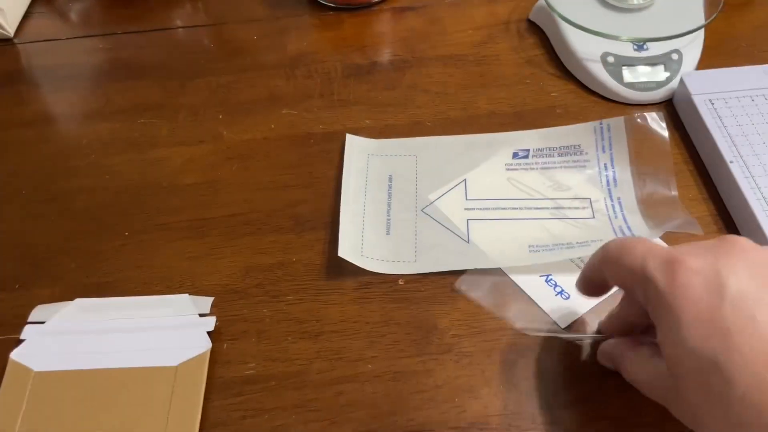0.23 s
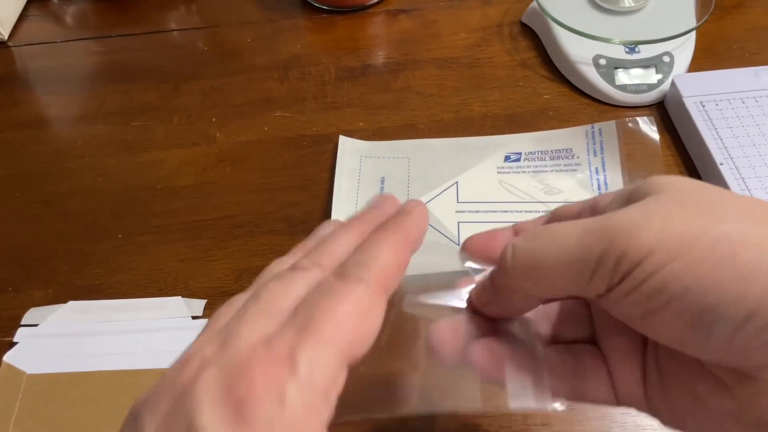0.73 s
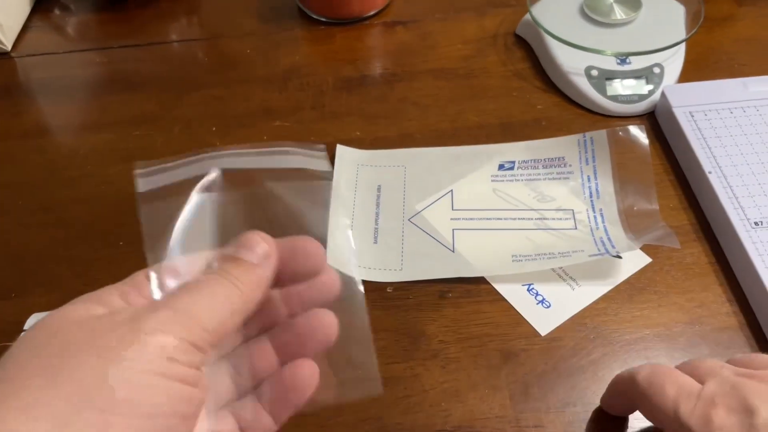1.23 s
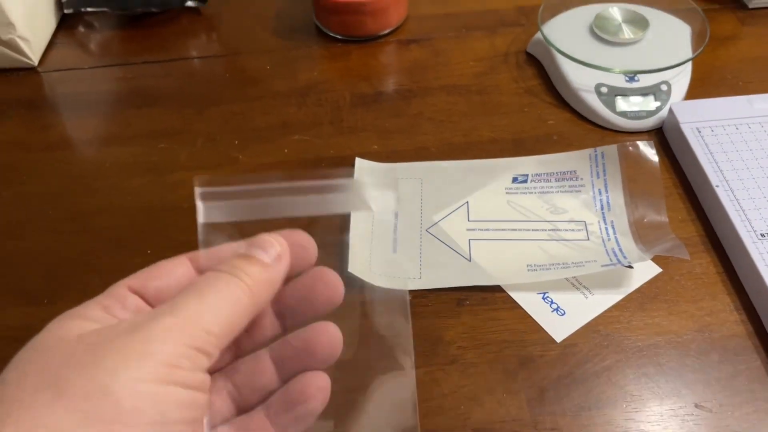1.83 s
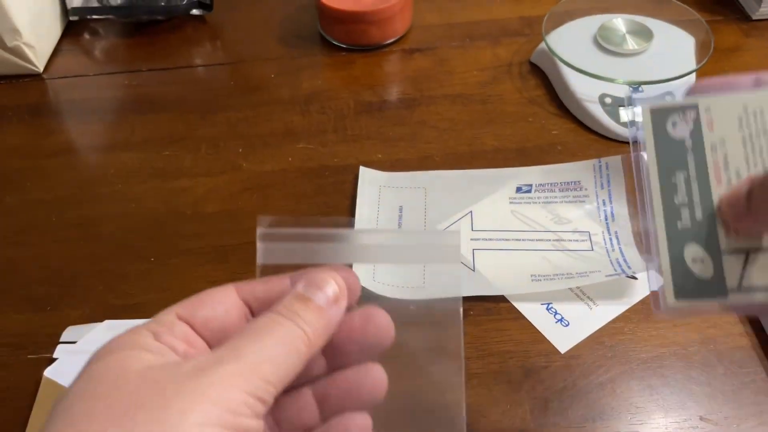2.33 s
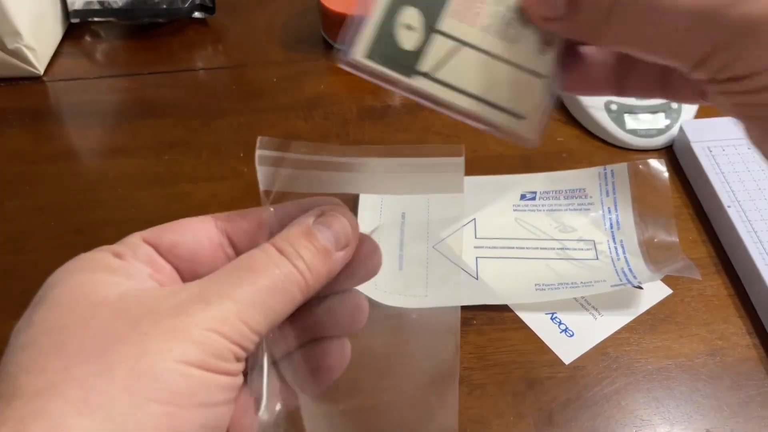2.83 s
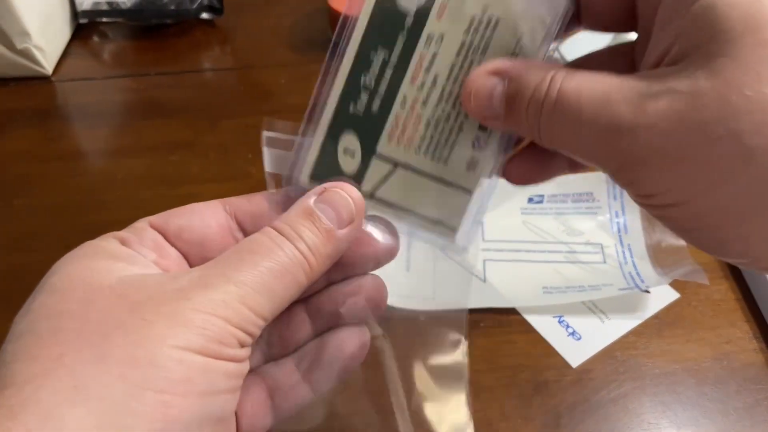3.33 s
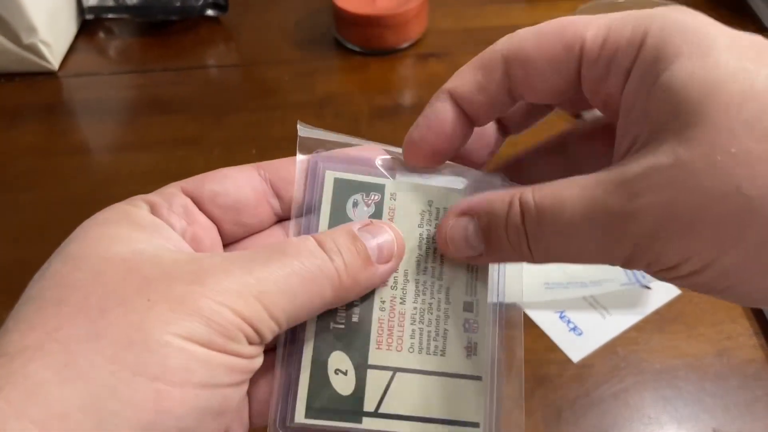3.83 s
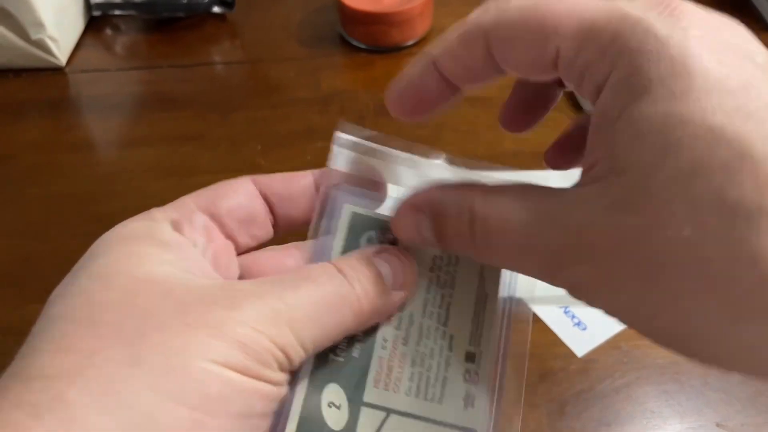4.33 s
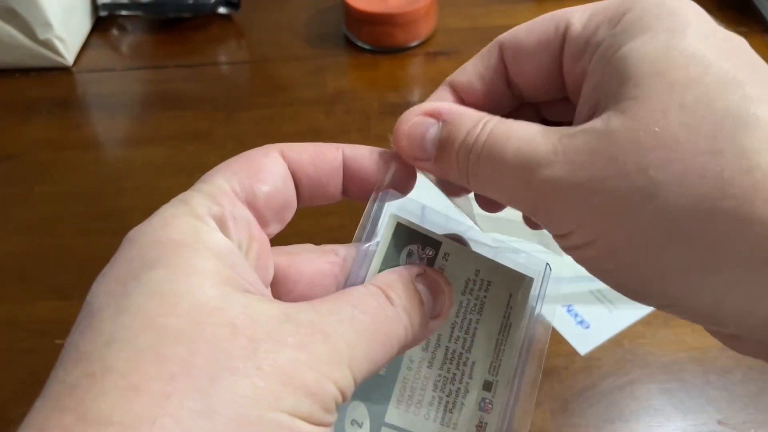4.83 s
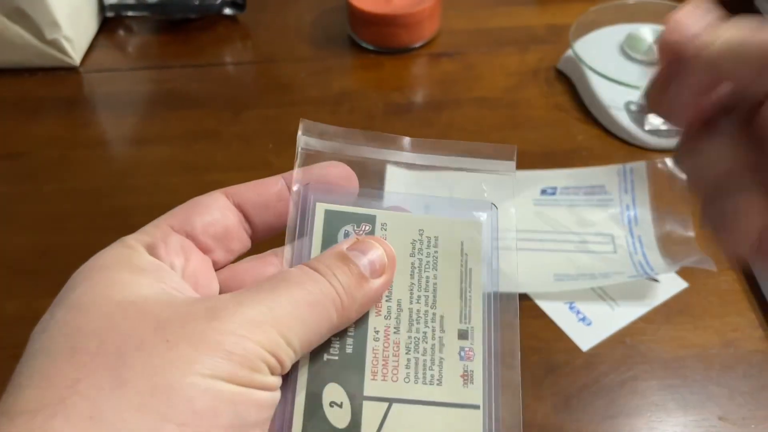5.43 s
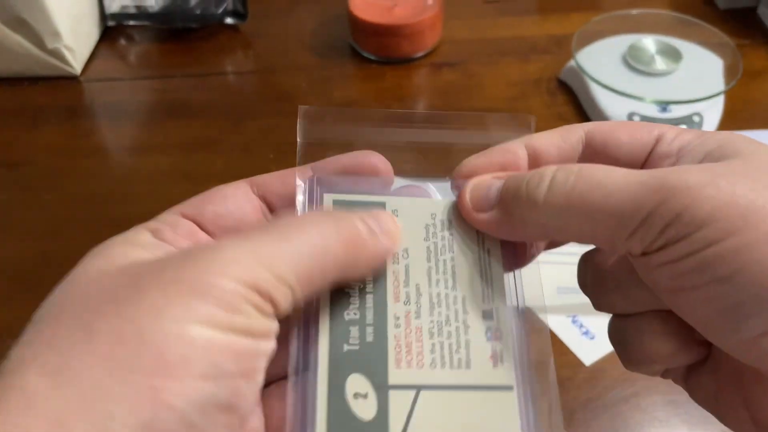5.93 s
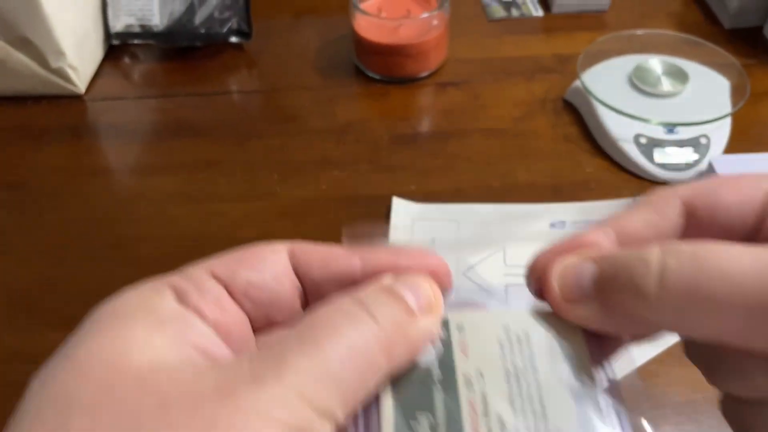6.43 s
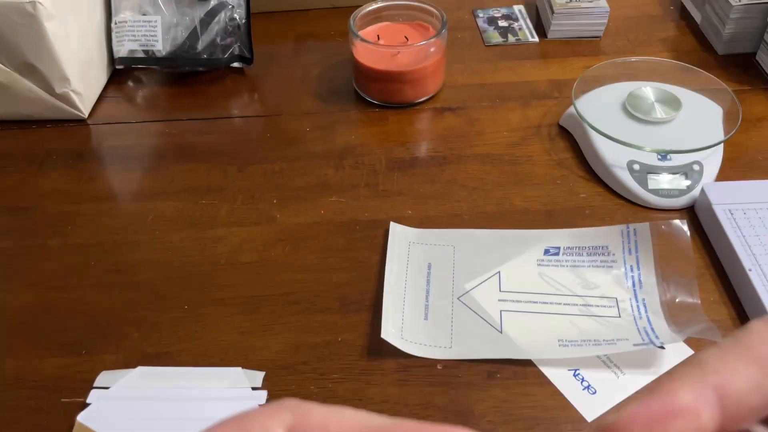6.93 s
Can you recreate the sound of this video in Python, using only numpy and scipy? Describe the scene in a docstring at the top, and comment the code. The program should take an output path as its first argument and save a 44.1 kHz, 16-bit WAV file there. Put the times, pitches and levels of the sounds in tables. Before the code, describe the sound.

Dry, intimate handling of crisp plastic film over a wooden table, indoors. Sparse snaps and soft bumps come first, then very faint rubbing, one bright tick, a thicker run of crackling as a rigid sleeve goes in, deep soft thuds, a sharp cluster of snaps as glue lets go, and short squeaky scrapes before it fades into quiet room air.

```python
"""A quiet room with a faint drone: on a wooden table, hands lift a thin plastic bag close to a two-port microphone,
slide a card holder in, peel the adhesive strip and fold the flap.
Snaps are short bursts that ring film and bag; rustle is patchy hiss with tiny grains, and scrapes are sliding resonances.
Forearms thump the table as falling sine tones. Rumble, room air, drone and a narrow hiss are shaped noise."""
import sys
import numpy as np
from scipy import signal
from scipy.fft import rfft, irfft
from scipy.io import wavfile
from scipy.ndimage import uniform_filter1d

SR = 44100
rng = np.random.default_rng(int(sys.argv[2]) if len(sys.argv) > 2 else 0)


def output_pcm(signal):
    """Save a mono or channel-first signal as 16-bit PCM at the path in sys.argv[1].

    Samples are clipped to [-1, 1] before scaling.
    """
    pcm = np.clip(np.atleast_2d(signal).T, -1, 1) * 32767
    wavfile.write(sys.argv[1], SR, np.round(pcm).astype(np.int16))


N = 317520  # samples

# Room air and table rumble, as tone colours. Each row: pitch in Hz, gain in dB.
AIR_COLOUR = [(120, -19.5), (150, -3.5), (232, -5.5), (346, -9.5), (500, -3.5), (700, -16), (1100, -13.5),
              (1300, -42), (2200, -25.5), (7000, -47.5)]
RUMBLE_COLOUR = [(18, -47), (30, -17.5), (44, -15), (65, -7.5), (103, -6), (178, -14.5), (260, -16),
                 (340, -36.5), (570, -120)]
# Level of the room air. Each row: time in seconds, level in dB.
AIR_LEVEL = [(0.0, -67), (0.86, -64.5), (1.0, -61.5), (1.96, -66), (2.36, -79), (3.03, -67), (3.19, -62.5),
             (4.89, -66), (5.35, -65), (6.32, -62), (6.76, -65.5), (7.2, -63)]
# Level of the table rumble under the moving arms. Each row: time in seconds, level in dB.
ARMS = [(0.0, -59), (0.4, -57), (1.08, -53), (1.46, -61.5), (2.36, -69.5), (3.07, -61.5), (3.25, -57),
        (3.83, -56), (4.07, -49.5), (4.43, -57), (4.65, -63.5), (5.61, -63), (5.81, -59.5), (6.24, -59),
        (6.36, -56), (7.2, -58.5)]
# An appliance drones. Its one row: pitch in Hz, width in Hz, level in dB relative to the room air.
HUM = (354, 22, 2.5)
# A faint narrow hiss comes and goes. Each row: start in seconds, end in seconds, level in dB.
WHISTLE = [(2.416, 3.293, -72.5), (4.504, 5.2, -81), (5.415, 6.548, -72)]
# Arms and hands landing on the table. Each row: start in seconds, peak in dB, nominal pitch in Hz.
THUMPS = [(.117, -43, 72), (0.441, -48, 99), (0.527, -35, 141), (0.613, -43, 112), (0.721, -45, 98),
          (0.804, -50, 88), (0.846, -40.5, 74), (0.937, -40.5, 78.5), (0.994, -41, 99), (1.176, -39.5, 197),
          (1.429, -50, 122), (3.044, -33, 185), (3.079, -43.5, 150), (3.151, -42, 235), (3.287, -52, 80),
          (3.398, -50, 94), (3.834, -42, 61), (3.926, -29, 75), (3.968, -32, 51), (4.049, -27, 100.6),
          (4.067, -28.5, 64.5), (4.085, -30, 72.4), (4.117, -38, 101), (4.167, -44, 149),
          (4.216, -32.5, 63.3), (4.32, -48, 78), (4.757, -42.5, 282), (5.004, -27, 297), (5.1, -38, 245),
          (5.624, -47.5, 87.5), (6.515, -36.5, 100)]
# Fingers rubbing the film, one row a stroke. Each row: start in seconds, end in seconds, rustle level in dB,
# treble in dB relative to the rustle, bag body in dB relative to the rustle.
RUB_STROKES = [(0, 0.102, -72, -1, -8), (0.148, 0.273, -63.5, 1.5, -11), (0.33, 0.405, -69.5, 1, -24),
               (0.413, 0.487, -61, 0.5, -4), (0.517, 0.695, -61.5, -4, -1.5), (0.782, 0.805, -48, -4, -1.5),
               (0.857, 0.961, -64, -7, -2), (1.047, 1.214, -59.5, -4, -2), (1.271, 1.317, -62, -0.5, -2.5),
               (1.38, 1.43, -65, -3.5, -10), (1.534, 1.65, -67, -3.5, -1.5), (1.675, 1.835, -62.5, -3, -6),
               (1.856, 1.91, -66.5, -7, 9), (2, 2.205, -74.5, -4, 4.5), (2.256, 2.408, -69, -5, -0.5),
               (2.45, 2.517, -82, -11, 9), (2.547, 2.654, -71, -4, 2), (2.648, 2.765, -58, -3, -10),
               (3.044, 3.244, -58, -6, 0.5), (3.284, 3.448, -56, 0, -5), (3.478, 3.555, -60.5, 3, -8),
               (3.618, 3.762, -57, 5.5, -12), (3.774, 3.818, -61, -23, 1), (3.898, 4, -69, -3.5, 2),
               (4.043, 4.083, -68, -1, 6), (4.206, 4.232, -52.5, -4, 4), (4.441, 4.467, -76, 12, 16),
               (4.468, 4.63, -57, -2.5, -4), (4.634, 4.76, -56, -5, -4), (4.839, 4.99, -63.5, -5, 6.5),
               (4.992, 5.15, -58.5, -2, 9), (5.234, 5.267, -59.5, 2, -6.5), (5.303, 5.423, -54, 0.5, -13),
               (5.48, 5.504, -64.5, 5, 2), (5.56, 5.727, -65, 2, -6), (5.838, 5.987, -69, 5.5, 4.5),
               (6, 6.057, -89, 5, 2), (6.118, 6.462, -72, -1.5, -2), (6.514, 6.589, -61, -3, -4),
               (6.666, 6.717, -79.5, 0.5, 3), (6.762, 6.889, -69.5, 0.5, -4), (6.97, 7.195, -70, -1.5, 0)]
# A taut patch of film sings under a sliding finger. Each row: start in seconds, end in seconds, first pitch in Hz,
# last pitch in Hz, width of each resonator pass in Hz, level in dB.
SCRAPES = [(0.187, 0.402, 5640, 5700, 1500, -66.5), (1.111, 1.233, 600, 448, 500, -49.5),
           (1.752, 1.843, 2540, 2470, 700, -60.5), (1.77, 1.812, 6800, 6740, 900, -61),
           (2.625, 2.667, 4300, 4300, 1210, -61.5), (3.798, 3.86, 2030, 2630, 500, -68),
           (5.287, 5.444, 2470, 2700, 497, -50.5), (5.29, 5.42, 3600, 3800, 1200, -59),
           (5.54, 5.598, 3700, 3820, 400, -67), (5.54, 5.65, 4600, 4830, 450, -68),
           (5.6, 5.642, 5550, 5560, 500, -56), (6.22, 6.436, 6500, 6370, 503, -68.5),
           (6.525, 6.624, 4400, 5040, 1000, -68), (6.753, 6.915, 7300, 7130, 905, -65.5),
           (7.023, 7.164, 2300, 2300, 1800, -68.5)]
# Film under the skin, its treble and the bag body while rubbed. Each row: pitch in Hz, gain in dB.
RUSTLE_COLOUR = [(1500, -30), (2300, -8), (3200, -5), (5000, 0), (6300, -1), (7400, -2), (8500, -13),
                 (11000, -30)]
SHEEN_COLOUR = [(6000, -30), (7000, -5), (7800, 0), (10000, -3), (13000, -8), (15000, -5), (16200, -6)]
BAG_COLOUR = [(350, 6), (600, -1.5), (1000, -5), (1600, -3), (1900, -7.5), (2400, -4.5)]
# Creases snapping and glue letting go. Each row: time in seconds, film energy in dB s, film pitch in Hz,
# bag body in dB relative to the film, body pitch in Hz, treble in dB relative to the film, nominal length in ms.
SNAPS = [(0.075, -82.5, 5900.0, -0.5, 700, -4, 3.2), (0.161, -69.0, 4200.0, -11, 950, 0, 2),
         (0.454, -77.5, 2300.0, -4, 1600, -14, 2.4), (0.5159, -60, 4700.0, -10.5, 1040, -6.5, 0.6),
         (0.7158, -81, 3300.0, -6, 660.0, -27, 0.51), (0.773, -68.5, 5500.0, -4, 930, 11, 16),
         (0.8049, -60.5, 3800.0, 5, 817, -7, 1.8), (0.8586, -71, 6500.0, 0, 1620, 1, 1),
         (0.876, -74, 4100.0, -2, 450.0, -20.0, 1.3), (0.8995, -65, 6500.0, -4, 590, 0.5, 0.9),
         (1.036, -81, 2700.0, -21, 900.0, -15.0, 0.6), (1.062, -67.5, 4100.0, -1.5, 870, -18, 0.79),
         (1.0722, -65, 4000.0, -1, 554, -15, 0.66), (1.076, -66, 4500.0, 6, 570, -12, 2.9),
         (1.092, -80, 4500.0, 9, 525.0, -3, 1.7), (1.157, -73, 4460, 1, 900, 3.5, 9.6),
         (1.167, -75.5, 3400, 19, 530, -7, 4), (1.186, -91.5, 4500.0, 27, 435, -12.0, 15),
         (1.2913, -75.5, 2700.0, 4, 880, -8, 3.5), (1.304, -77.5, 2700.0, 4, 640, -9, 6.8),
         (1.5215, -70.5, 4700.0, -4, 740, -25, 0.79), (1.5571, -87.5, 4800.0, 15, 544, -1.0, 5.7),
         (1.709, -61.5, 5300.0, -4.5, 888, -9, 2.4), (1.785, -76.5, 3300.0, -22, 900.0, -13, 4.3),
         (1.842, -80.5, 2500.0, 1, 1540.0, -12.0, 0.85), (1.856, -88, 2300, 1, 1500, -7, 0.91),
         (1.8622, -82, 2300.0, 0, 900.0, -8.0, 0.37), (1.8663, -79.5, 2300.0, 3, 1000, -19.0, 5.8),
         (1.8925, -75, 2300, 0.5, 1410, -9, 1.7), (1.897, -74, 2300.0, 3, 1620, -11, 14),
         (1.977, -84.5, 3900.0, 6, 635, -21, 1.8), (2.04, -88.5, 2300.0, 11, 2030, 7, 1.9),
         (2.094, -80.5, 2300.0, 2, 2020, -9, 10), (2.117, -79.5, 2300.0, 9.5, 740, -1, 0.59),
         (2.161, -89, 2300.0, 7.5, 1850, -2, 9.9), (2.189, -92, 2300.0, 0, 1700.0, -12, 2.2),
         (2.209, -94, 2300.0, 9, 1600.0, -9.0, 2.3), (2.224, -98, 2300.0, 16.5, 874, -13, 1.1),
         (2.2418, -88, 2600.0, 5, 1420, -31.0, 3.1), (2.308, -75.5, 3600.0, -3, 970, -19, 1.4),
         (2.396, -86.5, 4300.0, 8, 550, 2, 4.6), (2.4237, -82.5, 4200.0, 3, 796, -13, 0.65),
         (2.6914, -47, 6000.0, -24.5, 1410, 3, 0.91), (2.8149, -74.5, 3600.0, -4, 490, -9, 1.3),
         (3.0266, -77, 2300, 3, 1090, -7, 0.7), (3.028, -63.5, 6400.0, -7, 1070, 0.5, 7.3),
         (3.039, -73, 2280, 6, 1340, -11.5, 0.7), (3.0427, -59.5, 5400.0, 0, 1180, -7, 2.8),
         (3.053, -79, 2300.0, 9, 620.0, 3, 2.7), (3.0736, -84.5, 5300.0, 20, 760, 0.0, 1.7),
         (3.082, -68, 2300.0, -4, 1500.0, -12.0, 0.95), (3.0984, -57, 3300.0, -1.5, 1330, 7, 2.6),
         (3.1558, -59, 3300.0, 1, 575, -6, 1.7), (3.171, -70, 3000, 0.5, 510, 2, 2),
         (3.194, -75, 3000.0, -6, 840.0, -10, 0.96), (3.231, -58, 4400.0, -8.5, 1160, -6, 5.8),
         (3.2718, -64.5, 4700.0, 6.5, 1070, 1, 1.6), (3.2759, -57, 5200.0, -3, 473, 6.5, 1),
         (3.291, -62, 5700.0, -0.5, 1530, -1, 3.9), (3.3331, -58, 5300.0, -11, 1440, -0.5, 10.5),
         (3.3919, -58, 4700.0, -12, 804, 9, 0.7), (3.399, -69, 5500.0, 2, 765, -5, 2.3),
         (3.432, -88, 5400.0, 0, 1660.0, -4, 2.0), (3.457, -88.5, 5600.0, 25.5, 650, 1.0, 2.3),
         (3.52, -82, 4200.0, 1, 880, -9.0, 1.1), (3.528, -82, 4700.0, 6, 875, -9.0, 1.2),
         (3.5742, -62, 6800.0, -3.5, 1200, -1, 1.8), (3.622, -86.5, 7100.0, 12.5, 1000.0, -9.0, 0.88),
         (3.633, -77, 4800.0, -1, 448, -2, 2.8), (3.675, -84, 4100.0, 7, 1200.0, -9.0, 2.5),
         (3.76, -76.5, 6200.0, 3, 1160, -6, 0.57), (3.786, -80, 5400.0, -3, 1320, -7, 1.2),
         (3.809, -79, 4400.0, 3, 1490, -13, 1.6), (3.906, -72, 4100.0, -10, 590, -6, 10),
         (4.0118, -92, 5000.0, 21, 670, 8, 0.89), (4.026, -60.5, 4800.0, 0, 506, -2, 1.1),
         (4.111, -83.5, 2300.0, 15, 1350, -22, 0.66), (4.2043, -78.5, 4400.0, 16, 417, -16, 0.87),
         (4.225, -57.5, 2300.0, 5.5, 1400, 2.5, 2.6), (4.23, -71.5, 3100.0, 15.5, 930, -34, 0.76),
         (4.273, -71.5, 6100.0, 0.5, 601, 1, 16), (4.423, -86.5, 2300.0, 18.5, 414, 3, 1.5),
         (4.467, -51.5, 3200.0, -2, 598, 4, 0.86), (4.6759, -67.5, 3200.0, -2.5, 930, -4, 1.8),
         (4.7208, -86.5, 3300.0, 15, 1500.0, -8, 1), (4.741, -89, 5100.0, 19, 1590.0, -10.0, 1.2),
         (4.7572, -61.0, 5100.0, 5, 1570, 1.5, 1.9), (4.777, -65.5, 4000.0, -13, 1680.0, -25.5, 0.79),
         (4.796, -83, 2300.0, 13, 1250, -12.5, 2.4), (4.8683, -81, 2300.0, 17.5, 1430, -9, 1.2),
         (4.8945, -52, 4500.0, 4, 1460, 9.5, 1.7), (4.9059, -66.5, 4400.0, 6, 1130, -15, 0.72),
         (4.95, -66.5, 4100.0, -3, 1610, -3.5, 2.3), (5.0042, -48.5, 5400.0, 1, 523, 10, 3.3),
         (5.01, -54.5, 5400.0, 5, 390, 3.5, 1), (5.011, -62, 5340, 9, 1580, 1, 28),
         (5.0136, -47.5, 5400.0, -10, 524, -1.5, 1.5), (5.0166, -49.5, 5800.0, -8, 550, 3.5, 1.2),
         (5.02, -45.5, 5300.0, -7.5, 570, 15, 0.43), (5.026, -53, 5300.0, -6, 445, 1.5, 1),
         (5.026, -55, 6900.0, 10.5, 320, -3, 1.1), (5.0282, -57.5, 5600.0, 0.5, 330, 7, 3.6),
         (5.06, -59, 3000.0, 10.5, 1570, 7.5, 4), (5.0709, -44, 5000.0, 4, 687, 4, 5.3),
         (5.084, -62.5, 6500.0, 1, 1550, -4, 1.5), (5.088, -46.5, 4200.0, 4, 630, 2.5, 3.1),
         (5.1059, -43.5, 4500.0, -10.5, 795, 2.5, 0.56), (5.1094, -56, 4600.0, -9.5, 695, -5, 0.45),
         (5.1095, -43.5, 4400.0, -5, 670, -2.5, 0.46), (5.1135, -43.5, 3000.0, -16.5, 650.0, 6, 0.9),
         (5.1206, -50.5, 4600.0, -2, 626, 1.5, 0.9), (5.1242, -52.5, 5100.0, -6.5, 1310, 1, 1.1),
         (5.135, -64.5, 6500.0, -9, 570, 8, 3.2), (5.162, -58.5, 6700.0, -2, 1304, 1.5, 4.8),
         (5.183, -58, 4100.0, -6, 1250, 5, 2.7), (5.285, -78.5, 6800.0, -24, 430.0, 5, 1.2),
         (5.293, -73, 6400.0, -19, 430.0, 6, 1.6), (5.298, -69, 3600.0, -20, 460.0, 5.5, 3.6),
         (5.309, -61.5, 3300.0, -29, 810.0, -3, 2.3), (5.3239, -66.5, 3600.0, -18, 1007.0, 11, 0.39),
         (5.327, -69, 4000.0, -12, 480, 12.5, 3), (5.3465, -53, 2800.0, -29, 1900, -25, 1.8),
         (5.3704, -53, 6600.0, -32, 400.0, -3, 1.5), (5.3736, -81, 6500.0, -30.0, 400.0, 19, 0.91),
         (5.408, -60, 2800.0, -19.5, 1260.0, -1.5, 1.0), (5.4125, -79.5, 2800.0, -18, 1890.0, 14.5, 1.1),
         (5.445, -72, 5600.0, -23, 372.0, 2.5, 4), (5.478, -84, 2600, 1, 1310, -9, 1.7),
         (5.61, -80, 4800.0, -13, 406, 6, 3.9), (5.6193, -70, 4300.0, 2.5, 485, -1, 1.7),
         (5.677, -84, 5600.0, -18, 500.0, 10, 1.2), (5.695, -73.5, 5600.0, -4, 470.0, 2, 2.1),
         (5.73, -74, 6500.0, 2.5, 600, -10, 2.3), (5.857, -71, 6000.0, -14, 495, -3.5, 6.3),
         (5.91, -64, 2300.0, 2.5, 1260, -6, 1.5), (6.042, -77.0, 3400.0, -6, 500.0, 5, 5.7),
         (6.131, -84, 6600, -20, 884, 9, 2.9), (6.138, -79, 5600, -1, 1050, 7, 2),
         (6.1413, -66.5, 3900, -11, 1110, -6, 0.41), (6.1586, -87.5, 3600.0, 16.5, 650, 5, 3.1),
         (6.17, -92, 3500, 10, 1350, -12, 2), (6.1973, -80, 3500.0, 17.5, 1080, -20, 3.1),
         (6.231, -89, 3500.0, 9, 414, -22.0, 3.5), (6.3321, -72.5, 4100.0, -2, 1080, -1, 1.1),
         (6.397, -87.5, 2300.0, 6, 500.0, -15.0, 2.7), (6.4377, -83, 4000.0, 10.5, 1140, -23.0, 0.32),
         (6.476, -88.5, 3500, 14, 913, -10, 6.2), (6.5179, -79, 2800.0, 19.5, 980, -17, 1.1),
         (6.521, -84.5, 2300.0, 20.5, 1280, -15.0, 0.26), (6.5223, -85.5, 2300.0, 26, 604, -12, 2.2),
         (6.8545, -85, 7100.0, -6, 370.0, -14, 0.73), (6.87, -87, 2300.0, 7, 468, -5, 1.0),
         (6.95, -106, 2300.0, 23, 1600.0, -10.0, 0.84), (6.9632, -77, 2300.0, 8, 1470, 5.5, 2.5),
         (7.046, -97, 2300.0, 20.5, 860, -1, 1.1)]
# Film, treble and bag air of a snap. Each row: pitch in Hz, gain in dB.
FILM_COLOUR = [(1500, -26), (2300, -10), (2800, -3), (5000, 0), (6300, -1), (7200, -2), (8200, -24)]
SNAP_TREBLE = [(6000, -18), (7000, -1), (8200, 2), (10000, -5), (13000, -12), (15300, -8), (16200, -9)]
POP_COLOUR = [(200, -12), (320, -1.5), (600, -2), (1000, -2), (1450, -2), (1750, -1), (2050, -6.5),
              (2600, -37)]
# Colour of the reflections. Each row: pitch in Hz, gain in dB.
ECHO_COLOUR = [(300, -4), (1500, -6), (3000, 0), (15000, 0)]
# How long reflections ring. Each row: pitch in Hz, time to fall by 60 dB in seconds.
ECHO_T60 = [(300, 0.11), (2000, 0.2), (6000, 0.095), (15000, 0.1)]
# Timing between the ports. Each row: pitch in Hz, lead of the left port in radians.
PORT_PHASE = [(0, 0), (2000, .2), (5300, .5), (6200, -.4), (7600, -3.1), (8800, -3.3), (10500, -6.1),
              (12600, -6.5), (14000, -9.4), (16900, -9.6)]
# Loudness between the ports. Each row: pitch in Hz, left minus right in dB.
PORT_BALANCE = [(60, -.5), (180, -.5), (550, -1.5), (1200, 1), (2500, 2), (4970, 1.5), (8500, -1),
                (15000, 0)]
# The part in which the ports differ. Each row: pitch in Hz, gain in dB.
UNLIKE = [(60, -7), (300, -17), (700, -12), (1300, -11), (2400, -8), (5000, -11), (8000, -17), (15000, -14)]

LUMPY_DB = 3.8  # flicker of the rumble
WHISTLE_HZ, WHISTLE_WIDTH = 1935, 190  # pitch, and width of each resonator pass in Hz
TABLE_T60_S, TABLE_DAMPING = .085, 1.1  # ring time at nominal 100 Hz; it shortens with this power of pitch
GRIP_DB_PER_S, EASE_DB_PER_S = 486, 219  # a stroke swells quickly and dies away more slowly
GRAINY = .33  # tiny creases relative to the hiss of the rustle
RISE_MS, RISE_SHARE = 0.92, 0.026  # a longer release also strains longer
FILM_WIDTH_HZ, FILM_RING = 1900, 1.1  # width of each resonator pass, height over the broad film
BAG_WIDTH, QUICK_WIDTH = 0.65, 1.05  # resonator width as a share of pitch: steady buzz, quick release
STEP_PUSH = 5  # each step of a release shoves the air in the bag
OVERTONE, OVERTONE_RING = 1.97, .9  # the bag rings at two pitches about an octave apart
BAG_TOP_HZ = 1750  # the second pitch lies below the first if the overtone would reach this
DULL_FROM_DB, DULL_DB_PER_DB = 8, .5  # bodies this far over the film lose noise and second pitch
BODY_NOISE = .35
BUZZ_FROM_DB, STEADY_MS = -65, 4  # weaker releases stay noisy; full buzz takes 10 dB more and this length
SPREAD, SPREAD_HZ = .055, 2000  # low bending waves lag: SPREAD / sqrt(Hz) s, counted from this pitch
ECHO_DB = -14.0
EDGE_HZ = 16300  # top of the microphone's band


def gain_of(db):
    """Turns decibels into a linear gain."""
    return 10 ** (np.asarray(db) / 20)


def evened(x):
    """Scales to an RMS of 1 over all rows."""
    return x / np.sqrt(np.mean(x ** 2) + 1e-20)


def unit(x):
    """Scales to an energy of 1 in the first row, counted in seconds."""
    return x / np.sqrt((x[0] ** 2).sum() / SR)


def peaked(x):
    """Scales to a peak of 1 in the first row."""
    return x / abs(x[0]).max()


def read(points, hz):
    """Reads a table at any pitch, straight along a log pitch axis."""
    f, value = np.transpose(points)
    return np.interp(np.log(hz + 1), np.log(f + 1), value)


def level_curve(rows):
    """Draws a level in dB over the whole scene, straight between the rows."""
    s, db = np.transpose(rows)
    return np.interp(np.arange(N) / SR, s, db)


def add(mix, s, sound):
    """Lays a sound into the mix at s seconds, cut off at the end of the scene."""
    part = mix[:, round(s * SR):][:, :sound.shape[1]]
    part += sound[:, :part.shape[1]]


def coloured(x, points):
    """Causal minimum-phase filter with the gain of the table, steep outside its ends."""
    hz = abs(np.fft.fftfreq(4096, 1 / SR))
    ends = [(points[0][0] / 2, -80)] + list(points) + [(points[-1][0] * 1.3, -80)]
    log_gain = np.log(gain_of(read(ends, hz)))
    taps = np.fft.ifft(np.exp(np.conj(signal.hilbert(log_gain)))).real[:2048]
    return signal.oaconvolve(x, taps[None], axes=1)[:, :x.shape[1]]


def resonate(x, hz, width):
    """Shifts hz down to zero, smooths, and shifts back: a resonance of gain 1."""
    turn = np.exp(2j * np.pi * np.cumsum(hz * np.ones(x.shape[1])) / SR)
    r = np.exp(-np.pi * width / SR)
    return 2 * (turn * signal.lfilter([1 - r], [1, -r], x / turn)).real


def resonate_twice(x, hz, width):
    """Two passes of one resonance, for steeper sides."""
    return resonate(resonate(x, hz, width), hz, width)


def hiss(points, patchy_db, flicker_db):
    """Noise in two unrelated rows whose level wanders in patches and flickers across all pitches."""
    hz, t, z = signal.stft(rng.standard_normal((2, N)), SR, nperseg=256)
    patches = rng.standard_normal(z.shape[1:])
    patches = uniform_filter1d(patches, size=5, axis=0)
    patches = evened(uniform_filter1d(patches, size=25, axis=1))
    flicker = evened(uniform_filter1d(rng.standard_normal(len(t)), size=4))
    z = z * gain_of(patchy_db * patches + flicker_db * flicker)
    noise = signal.istft(z, SR, nperseg=256)[1][:, :N]
    return evened(coloured(noise, points))


def table_rumble():
    """Moving arms stir the table: low noise with a lumpy level."""
    return gain_of(level_curve(ARMS)) * hiss(RUMBLE_COLOUR, 0, LUMPY_DB)


def room_air():
    """Soft air noise and a wavering drone of narrow noise, both following the room level."""
    hz, width, hum_db = HUM
    air = hiss(AIR_COLOUR, 1.3, 0.26) * gain_of([[0], [9]])  # far sound differs more between the ports
    drone = evened(resonate(rng.standard_normal((2, N)), hz, width))
    return gain_of(level_curve(AIR_LEVEL)) * (air + gain_of(hum_db) * drone)


def narrow_hiss():
    """Noise through a narrow resonance, faded in and out."""
    swell = np.zeros((1, N))
    for start, end, db in WHISTLE:
        fade = signal.windows.tukey(round((end - start) * SR), .3)
        add(swell, start, gain_of(db) * fade[None])
    return swell * evened(resonate_twice(rng.standard_normal((2, N)), WHISTLE_HZ, WHISTLE_WIDTH))


def thumps():
    """A soft blow bends the table top; high bending waves arrive first, so the pitch falls."""
    out, t = np.zeros((2, N)), np.arange(9000) / SR
    for s, db, hz in THUMPS:
        t60 = TABLE_T60_S * (100 / hz) ** TABLE_DAMPING
        # the pitch glides from about 2.5 to 0.61 times nominal
        turns = hz * (0.61 * t + 0.011 * (1 - np.exp(-t / 0.0058)))
        onset = np.sin(np.minimum(t / 0.0065, 1) * np.pi / 2) ** 2
        blow = onset * gain_of(-60 * (t / max(t60, .02)) ** 1.8)
        tone = blow * np.sin(2 * np.pi * turns)
        add(out, s, gain_of(db) * peaked(np.outer([1, .2], tone)))
    return out


def strokes():
    """Gains of rustle, treble and bag body: swell, hold and fade of every stroke, summed in power."""
    t, power = np.arange(0, N + 64, 64) / SR, 0
    for start, end, db, treble_db, bag_db in RUB_STROKES:
        swell_db = GRIP_DB_PER_S * np.maximum(start - t, 0)
        fade_db = EASE_DB_PER_S * np.maximum(t - end, 0)
        level_db = db - swell_db - fade_db
        power = power + gain_of(level_db + np.array([[0], [treble_db], [bag_db]])) ** 2
    return [np.interp(np.arange(N) / SR, t, np.sqrt(p)) for p in power]


def scrapes(drag):
    """A finger's rough drag excites a taut patch of film, whose resonance slides in pitch."""
    out = np.zeros((2, N))
    for start, end, from_hz, to_hz, width, db in SCRAPES:
        stroke = drag[:, round(start * SR):round(end * SR)]
        hz = np.linspace(from_hz, to_hz, stroke.shape[1])
        sung = evened(resonate_twice(stroke, hz, width))
        add(out, start, gain_of(db) * sung * signal.windows.tukey(stroke.shape[1], .6))
    return out


def rustle():
    """Skin drags over film: soft hiss with many tiny creases of uneven size, coming in clumps."""
    film_gain, treble_gain, bag_gain = strokes()
    clumps = gain_of(6.5 * evened(uniform_filter1d(rng.standard_normal(N), size=700)))
    struck = rng.random(N) < 600 * clumps / SR  # 600 creases a second, times the clumping
    size = gain_of(3.5 * np.minimum(rng.exponential(1, N), 5)) * struck
    ring = signal.lfilter([1], [1, -np.exp(-1 / (0.00026 * SR))], size)  # each dies in 0.26 ms
    grains = ring * rng.standard_normal((3, 2, N))
    film = evened(hiss(RUSTLE_COLOUR, 1.7, 1.7) + GRAINY * evened(coloured(grains[0], RUSTLE_COLOUR)))
    sheen = evened(hiss(SHEEN_COLOUR, 2.2, 1.5) + .45 * evened(coloured(grains[1], SHEEN_COLOUR)))
    bag = evened(hiss(BAG_COLOUR, 2.5, 2.5) + .35 * evened(coloured(grains[2], BAG_COLOUR)))
    rubbed = film_gain * film + treble_gain * sheen + bag_gain * bag
    drag = rng.standard_normal((2, N)) * np.sqrt(clumps) + GRAINY * evened(grains[0])
    return rubbed + scrapes(drag)


def film_ring(excitation, hz):
    """The burst shakes the film broadly and rings one patch of it."""
    film = unit(coloured(excitation, FILM_COLOUR))
    return unit(film + FILM_RING * resonate_twice(film, hz, FILM_WIDTH_HZ))


def bag_ring(push, hz, body_db, steady):
    """Bending waves reach the air in the bag, low ones late, and ring it at two pitches."""
    body = coloured(push, POP_COLOUR)
    pitch = np.fft.rfftfreq(body.shape[1], 1 / SR)
    lag = SPREAD * (2 * np.sqrt(pitch) - pitch / np.sqrt(SPREAD_HZ))
    body = irfft(rfft(body) * np.exp(-2j * np.pi * lag), body.shape[1])
    width = hz * (QUICK_WIDTH + (BAG_WIDTH - QUICK_WIDTH) * steady)
    other_hz = hz * OVERTONE if hz * OVERTONE < BAG_TOP_HZ else hz / OVERTONE
    # a release with little film sound rings mostly one pitch
    crisp = gain_of(-DULL_DB_PER_DB * max(body_db - DULL_FROM_DB, 0))
    main = resonate_twice(body, hz, width)
    other = resonate_twice(body, other_hz, width)
    ringing = main + OVERTONE_RING * crisp * other
    return unit(crisp * body * (1 - 0.45 * steady) + 1.9 * ringing)


def snaps():
    """A crease strains, then buckles: the burst rings a patch of film, its treble and the air in the bag."""
    out, lead = np.zeros((2, N)), 400  # samples kept ahead of the release
    ms = (np.arange(1800) - lead) / SR * 1e3
    after = np.maximum(ms, 0)
    settle = .08 * np.exp(-after / 6)
    for s, db, hz, body_db, body_hz, treble_db, length in SNAPS:
        noise = rng.standard_normal((3, 2, len(ms)))
        rise = RISE_MS + RISE_SHARE * length
        blunt = 1 + .5 * min(rise * length, 3)  # a slow release holds its level, then stops short
        strain = np.exp(-(np.maximum(-ms, 0) / max(0.97 * rise, .05)) ** blunt)
        release = np.exp(-(after / max(1.3 * length, .1)) ** blunt)
        swing = ms * body_hz / 1e3 % 1
        chatter = 0.34 + np.exp(-swing / 1.3)  # it lets go in steps, once a swing of the bag
        burst = strain * (release + settle) * chatter
        jump = 10.0 / (1 + rise * length) * (ms == 0) * [[1], [.5]]  # strongest in a quick snap
        film_push, treble_push = noise[:2] * burst + jump
        loud = np.clip((db + body_db - BUZZ_FROM_DB) / 10, 0, 1)
        steady = min(length / STEADY_MS, 1) ** 2 * loud  # long, loud releases buzz evenly
        steps = (np.diff(swing, prepend=0) < 0) * burst * [[1], [.5]]
        body_push = BODY_NOISE * noise[2] * burst + jump + STEP_PUSH * steady * steps
        film = film_ring(film_push, hz)
        treble = unit(coloured(treble_push, SNAP_TREBLE))
        body = bag_ring(body_push, body_hz, body_db, steady)
        sound = film + gain_of(treble_db) * treble + gain_of(body_db) * body
        add(out, s - lead / SR, gain_of(db) * sound)
    return out


def echoes(x):
    """Reflections of table and walls: sparse taps whose bands die at their own speed."""
    taps = rng.standard_normal((2, SR // 3)) * (rng.random((2, SR // 3)) < .06)
    taps[:, :round(.004 * SR)] = 0
    hz, t, z = signal.stft(taps, SR, nperseg=128)
    fade_db = read(ECHO_COLOUR, hz)[:, None] - 60 * t / read(ECHO_T60, hz)[:, None]
    tail = signal.istft(z * gain_of(fade_db), SR, nperseg=128)[1]
    return signal.oaconvolve(x[:1], tail / np.linalg.norm(tail[0]), axes=1)[:, :N]


def scene():
    """Row 0 reaches both ports alike; row 1 is the part in which they differ."""
    background = table_rumble() + room_air() + narrow_hiss()
    near = snaps()
    return background + thumps() + rustle() + gain_of(ECHO_DB) * echoes(near) + near


def record(dry):
    """Two ports of unequal path shift and weigh the sound; bass cut, soft overload, band limit."""
    hz = np.fft.rfftfreq(N, 1 / SR)
    bass_cut = 1 / (1 + (32 / (hz + 1)) ** 4)
    same, unlike = rfft(dry, axis=1) * bass_cut
    unlike = unlike * gain_of(read(UNLIKE, hz))
    tilt = gain_of(read(PORT_BALANCE, hz) / 2)
    left = (same + unlike) * tilt * np.exp(1j * read(PORT_PHASE, hz))
    right = (same - unlike) / tilt
    ports = irfft(np.array([left, right]), N, axis=1)
    ports = ports / (1 + abs(ports / .72) ** 4) ** .25  # bends towards a ceiling of 0.72
    band = signal.firwin(511, EDGE_HZ, window=("kaiser", 10), fs=SR)
    return signal.oaconvolve(ports, band[None], "same")


dry = scene()
out = record(dry)
output_pcm(out)
```